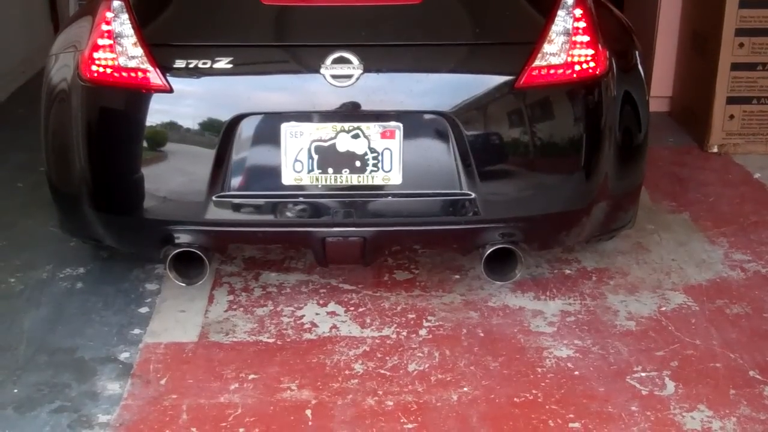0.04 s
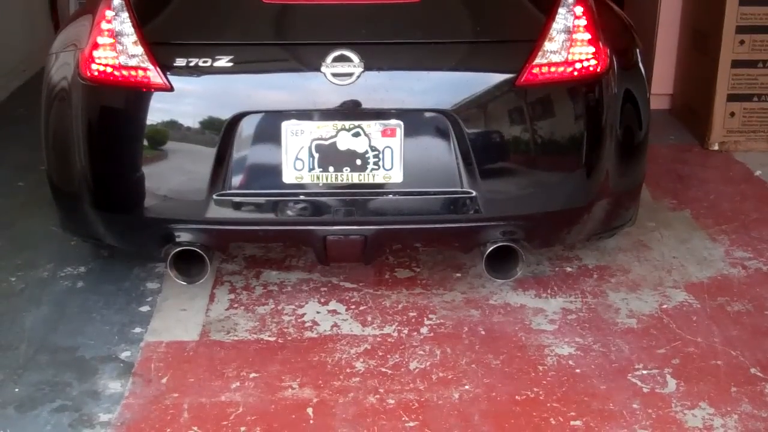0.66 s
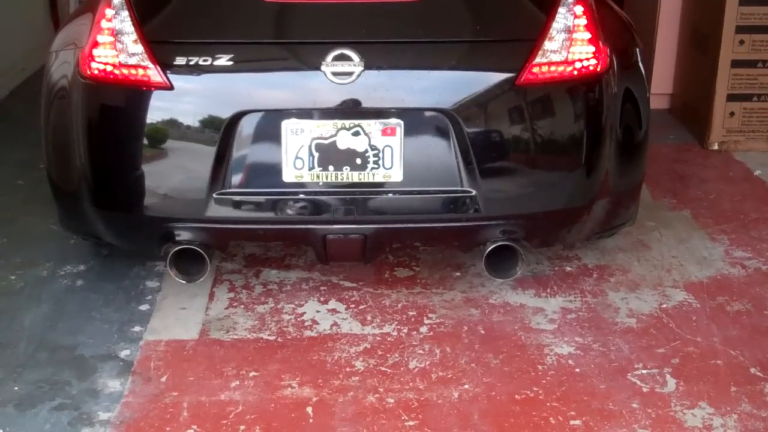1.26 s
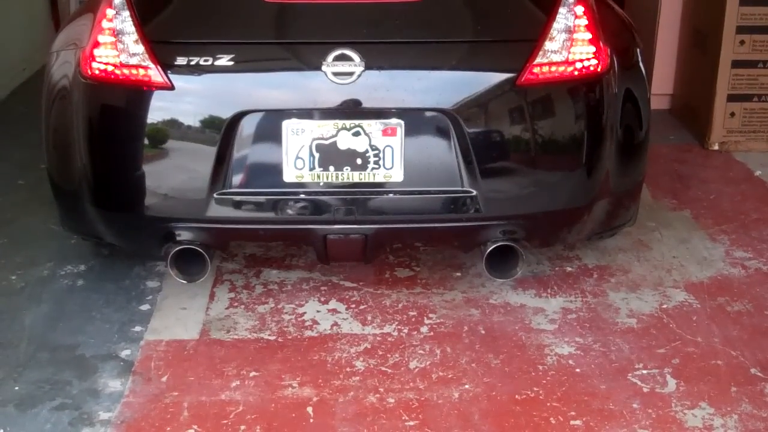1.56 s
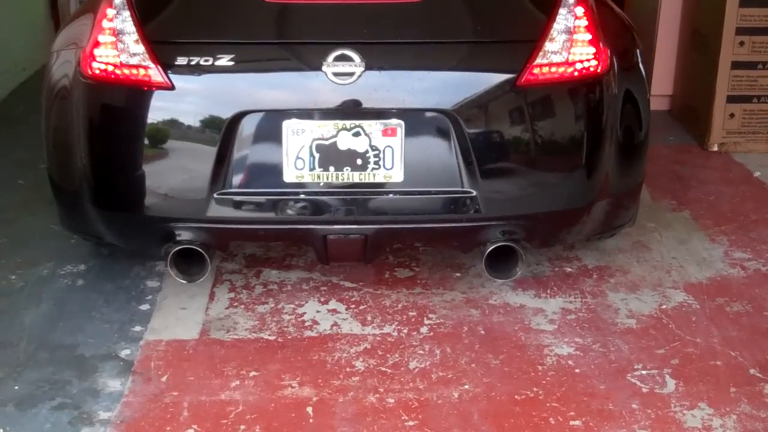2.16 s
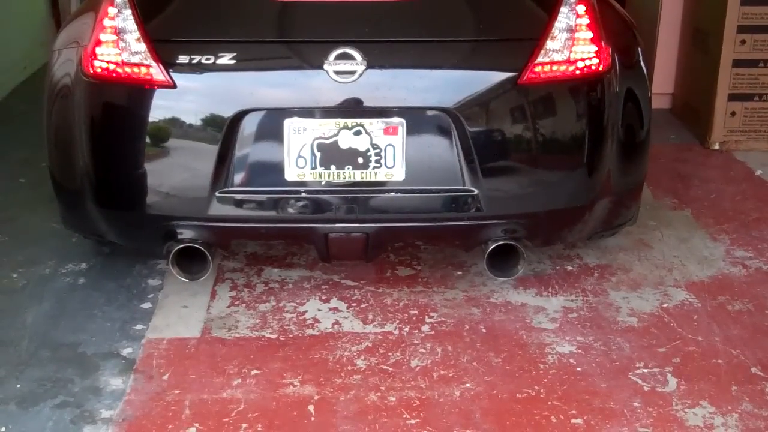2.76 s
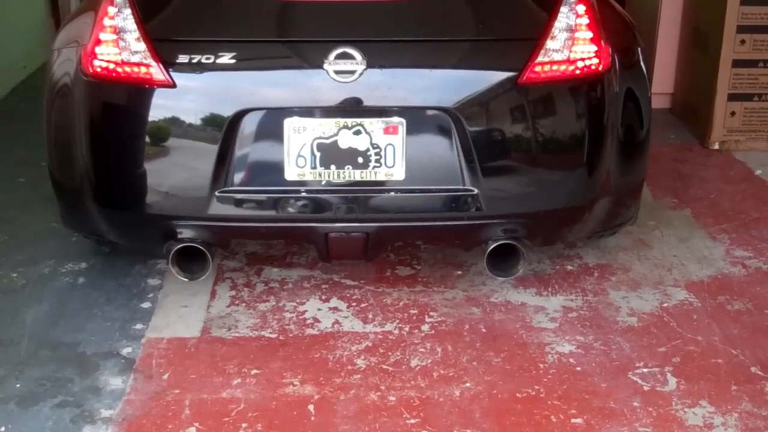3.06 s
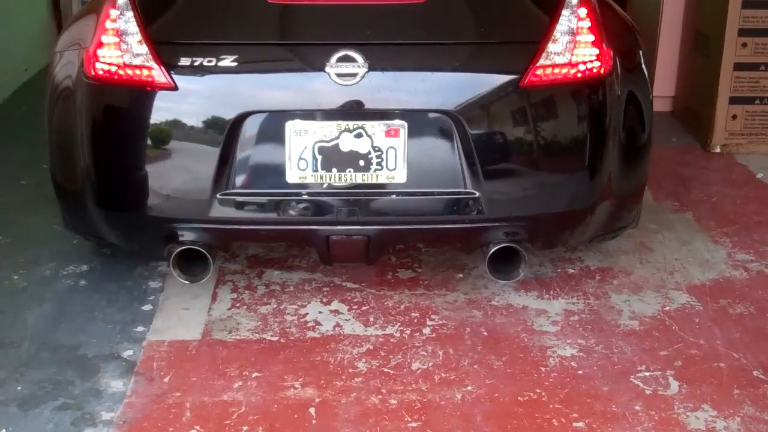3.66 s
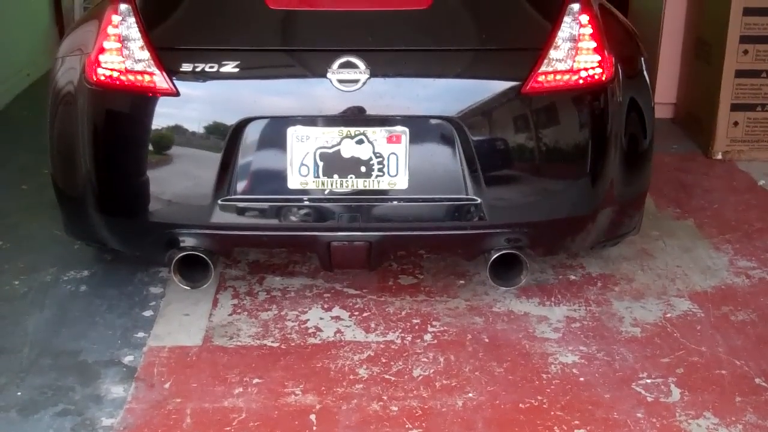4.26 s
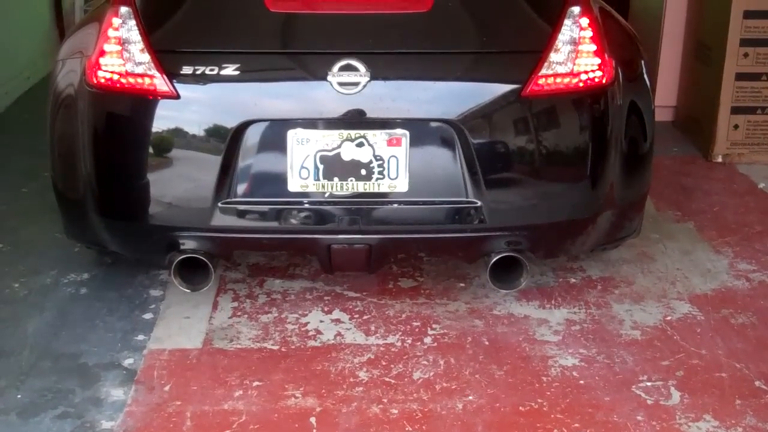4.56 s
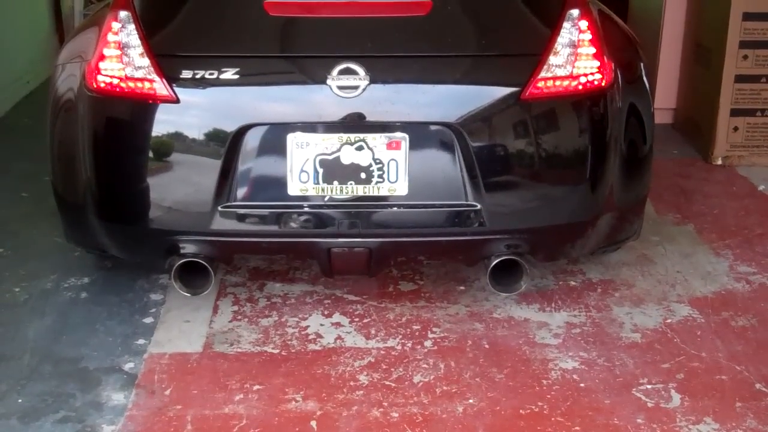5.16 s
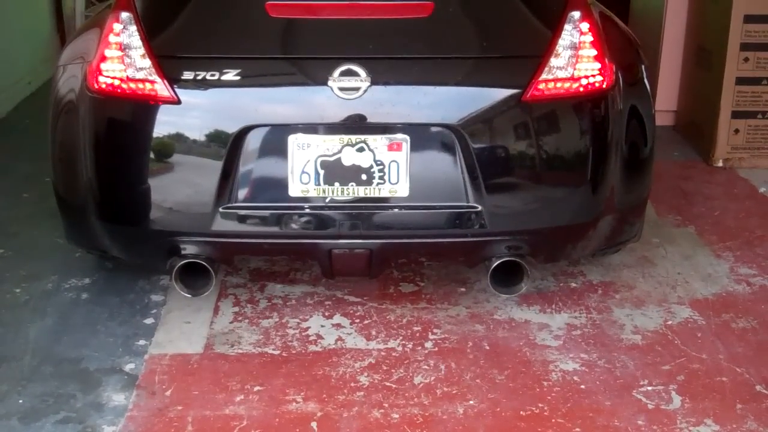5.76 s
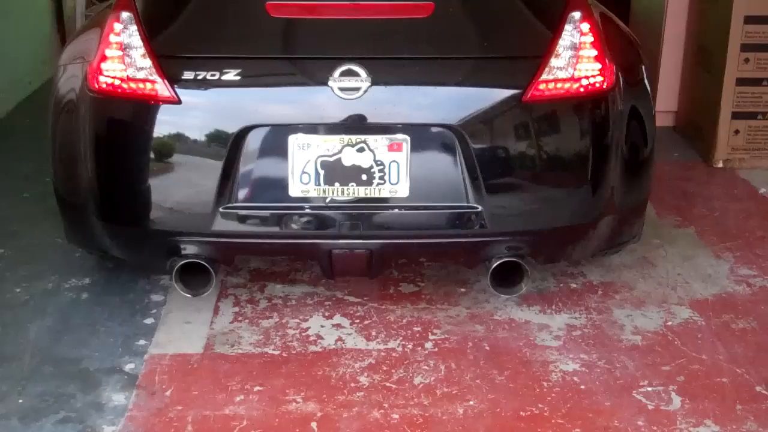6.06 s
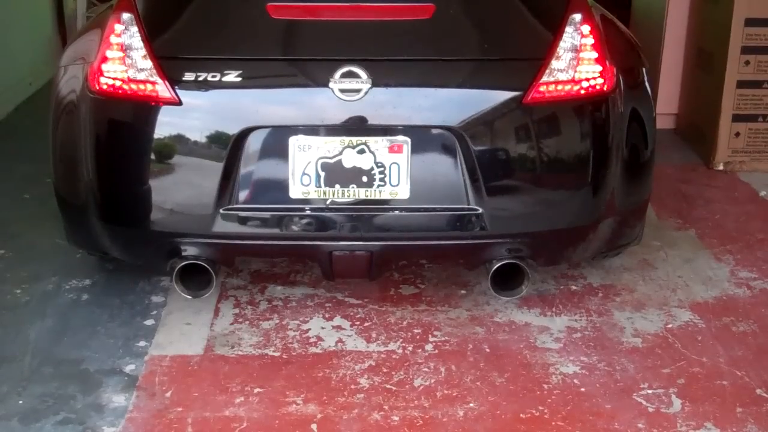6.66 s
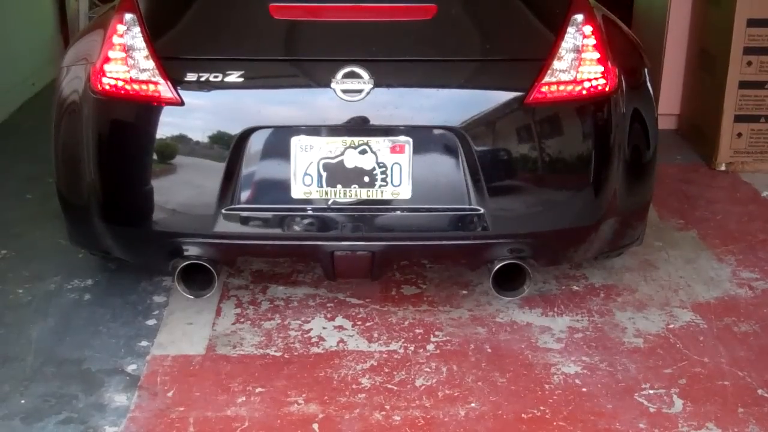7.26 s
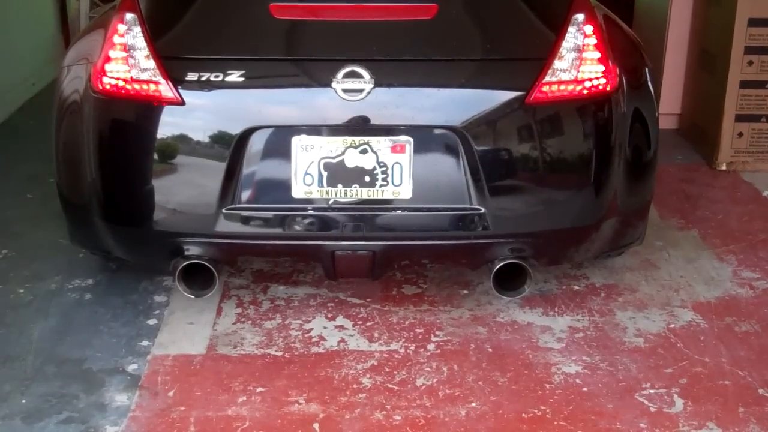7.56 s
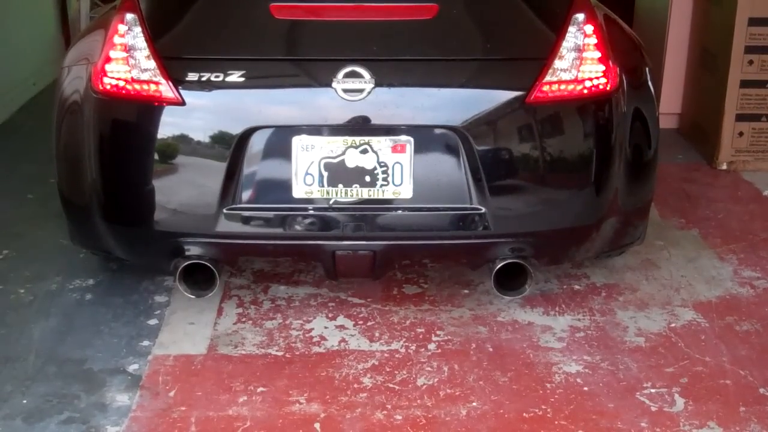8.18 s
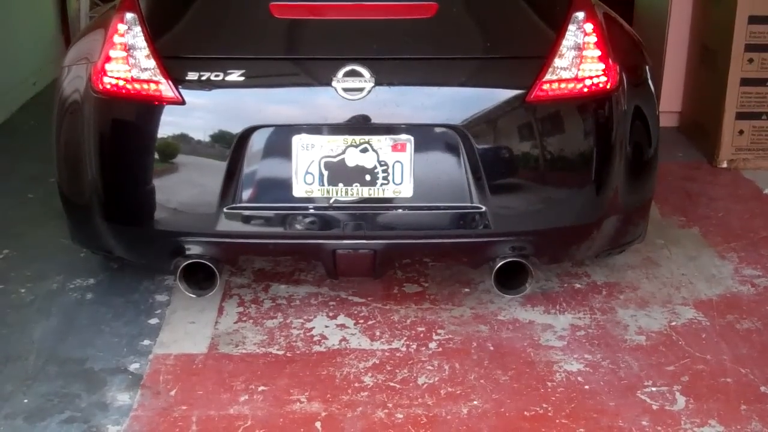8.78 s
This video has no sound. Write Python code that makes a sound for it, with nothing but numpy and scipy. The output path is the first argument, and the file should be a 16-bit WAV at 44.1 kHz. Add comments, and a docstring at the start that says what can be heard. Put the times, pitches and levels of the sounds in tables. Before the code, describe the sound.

A starter motor grinds and clangs at once, straining in three quick strokes with a faint high whine. At about 0.5 seconds a six-cylinder car engine with no muffler catches with a few uneven, thudding bangs. It fires up with a sharp crack near 0.7 seconds and revs to a brief peak just before 1 second. The revs sag around 1.4 seconds, lift again and waver, then settle by about 3 seconds into a loud, fast idle. The exhaust throbs evenly with a low boom, a midrange bark and a hard rasp over a steady hiss. Occasional firings crack harder, most clearly around 5.5 and 6.7 seconds. From about 8.3 seconds the engine speed rises a little, still running at 9 seconds. The sound is close, heard just behind the twin tailpipes, with short garage echoes.

```python
"""A six-cylinder car with no muffler is started in a garage, heard from just behind its two tailpipes.
First the starter motor grinds and clangs, straining each time a piston squeezes the air in a cylinder.
Then the engine catches with a few thudding bangs, revs up and settles into a fast idle over a hiss.
Each firing makes the pipes ring with a low boom, a middle bark and a high rasp. Some cylinders rasp
harder than others, so the idle throbs once per engine cycle. Near the end the speed rises a little."""
import sys
import numpy as np
from scipy import signal
from scipy.fft import rfft, irfft, next_fast_len
from scipy.io import wavfile
from scipy.ndimage import uniform_filter1d

SR = 44100
rng = np.random.default_rng(int(sys.argv[2]) if len(sys.argv) > 2 else 0)


def store_wav(level_fs):
    """Save 16-bit WAV to argv[1]."""
    pcm = np.round(np.clip(np.atleast_2d(level_fs), -1, 1) * 32767)
    wavfile.write(sys.argv[1], SR, pcm.T.astype(np.int16))


N = 397782

# engine speed: it revs up, wavers, idles, then rises a little (time [s], speed [rpm])
ENGINE_SPEED = [(0.66, 1293), (0.72, 1561), (0.84, 1644), (0.94, 1590), (1.22, 1348), (1.42, 1245),
                (1.55, 1374), (1.71, 1472), (2.24, 1361), (2.28, 1292), (2.63, 1352), (2.99, 1293),
                (3.85, 1339), (4.93, 1329), (6.38, 1344), (8.2, 1346), (8.63, 1403), (8.85, 1457)]
# how hard the cylinders fire, compared with the idle (time [s], level [dB])
ENGINE_LOAD = [(0.67, 2), (0.74, -0.5), (0.92, -0.5), (1.08, 2.5), (1.2, -0.9), (1.42, -2.5), (1.5, -8),
               (1.8, 0.5), (2.24, 0), (2.36, -3.5), (2.65, -1), (3.9, 2.5), (4.08, 0.3), (4.3, 1),
               (7.0, 0.5), (8.65, 0.5), (8.9, 1.1)]
# how the cylinders differ, in firing order (strength [dB], valve lag [s], rasp [dB], tick [dB], bark [dB])
CYLINDER_TRAITS = [(-0.17, -.00007, 4, -3, 0), (0, .00017, 3, -4.5, -1.8), (-1.5, -.00003, 6.5, -4, 1.5),
                   (-2, .00002, 7.5, -7.5, 0), (-3.5, -.00025, -0.5, -5, -1.5),
                   (-1.5, .00017, -1, -17, -2.5)]
# single firings that burn hard and crack out (time [s], extra rasp [dB])
CRACKS = [(0.69, 11), (0.702, 4), (1.002, 6), (1.083, 5), (3.212, 2), (3.486, 2), (3.847, 0), (3.937, 4),
          (5.469, 6), (6.617, 6), (6.795, 8.5), (7.702, 3), (7.88, 4)]
# the first, uneven firings, in relative levels (time [s], boom [dB], bark [dB], rasp [dB])
FIRST_BANGS = [(0.522, -32, -52, -59), (0.550, -27.5, -36, -50), (0.574, -27.5, -35.5, -39),
               (0.593, -29, -31, -40.5), (0.61, -27, -34, -41.5), (0.627, -29, -41, -45),
               (0.642, -29.5, -34, -49)]
# the boom is weak while the engine revs above the pipes' own pitch (time [s], level [dB])
BOOM_CURVE = [(0.76, -31.5), (1.0, -29.5), (1.08, -25), (1.44, -26), (1.52, -27.5), (2.1, -23),
              (2.4, -25.1), (3.9, -25.5), (4.05, -26.7), (4.7, -25.5), (8.3, -25), (8.75, -25.5)]
# low, then middle ringing tones of the pipes (pitch [Hz], width [Hz], level [dB], push or pull [+1/-1])
BOOM_TONES = [(135.3, 22.2, -0.1, -1), (157.4, 18.9, -4.5, 1), (211.5, 225, -19, 1), (241.4, 21, -1, -1),
              (276, 18.7, -1.5, 1), (351, 66, -5.5, -1), (374, 10.4, 1.5, 1)]
BARK_TONES = [(472.2, 37.6, -7.5, -1), (480.3, 33.5, -5.5, 1), (545.5, 5.2, -11.5, -1), (569, 24, -18.5, 1),
              (642.2, 16, -19, 1), (679, 26, -17, -1), (733, 23, -18.5, 1), (766.3, 19, -16.5, -1)]
# tones of the tips' rasp, their slap and the pipe walls' tick (pitch [Hz], width [Hz], level [dB])
RASP_TONES = [(870, 91, -9), (915, 19, 4), (993, 103, -0.5), (1098, 95, 2.5), (1216, 50, -2),
              (1361, 22, 1.5), (1440, 24, 0.5)]
SLAP_TONES = [(400, 87, -7), (683, 170, -7.5)]
TICK_TONES = [(2475, 70, -7), (2553, 43, -2), (2720, 79, -7)]
# the starter strains as each piston squeezes its air (time [s], level [dB])
STARTER_STROKES = [(0.088, -34.5), (0.232, -36.5), (0.348, -34.5)]
# the starter's small gear knocks against the engine's big gear (time [s], level [dB])
GEAR_KNOCKS = [(0.078, -31), (0.12, -41), (0.225, -35), (0.344, -42)]
# ringing tones of the big gear and its housing (pitch [Hz], width [Hz], level [dB])
GEAR_TONES = [(915, 33, 4), (960, 28, 2), (1064, 76, -4), (2244, 79, 0), (2407, 18, 6), (2550, 15, -3),
              (2800, 13, 1), (5380, 9.6, 1)]
# tone colour of the grinding gears, the rushing gas and the garage's noise (frequency [Hz], level [dB])
GRIND_COLOUR = [(60, -18), (300, -16), (600, -12.5), (770, -15), (900, -10), (1300, -2), (1780, -1.5),
                (2330, -6), (3140, -1), (5640, -3.5), (6290, -9.5), (10300, -18), (13000, -38)]
HISS_COLOUR = [(1700, 4), (2000, -12), (2450, 3), (3200, 0.5), (4100, 2), (5300, 0), (6500, 2.5),
               (7400, -0.5), (8500, -2), (9400, -1.5), (10300, -4.5), (11000, -9.5), (12500, -19)]
ROOM_COLOUR = [(25, -31), (45, 3.5), (80, -7), (120, -24), (300, -23), (700, -5.5), (2000, -9.5),
               (12000, -48)]
# how alike noise is in both ears (frequency [Hz], likeness [0 to 1])
EAR_LIKENESS = [(100, 0.97), (600, 0.99), (1200, 0.88), (2200, 0.76), (4000, 0.61), (7500, 0.36),
                (12000, 0.19)]
# how far noise leans to the left (frequency [Hz], left minus right [dB])
LEFT_LEAN = [(1000, -0.3), (4000, 0), (5800, 1), (7000, 1), (9000, 8), (11000, 5), (13000, -1.5)]

RUNS_FROM_S, SETTLED_S = .657, 3.3   # the engine runs by itself, then has settled down


def engine(front_lag_s=0.0001, bark_db=-38.5, rasp_db=-46.5, tick_db=-64, slap_db=-47.5):
    """Firings ring the exhaust, more harshly under load; returns the boom, harsh part and gas flow."""
    boom_db, = in_time(BOOM_CURVE)
    load_db, = in_time(ENGINE_LOAD)
    times, sizes, bark_sizes, rasp_sizes, tick_sizes = firings()
    low = from_db(boom_db) * blow_pipe(boom, times, sizes, grit=0.0092)
    barks = blow_pipe(bark, times, bark_sizes, grit=.017 * unevenness(np.arange(N) / SR))
    slaps = even_out(slap(times, bark_sizes * np.sqrt(rasp_sizes)))   # strong pulses steepen in the pipe
    rasps = even_out(rasp(times + front_lag_s, rasp_sizes))
    ticks = even_out(tick(times + front_lag_s, tick_sizes))
    harsh = from_db(bark_db + 1.17 * load_db) * barks   # the bark follows the load most
    harsh += from_db(rasp_db + load_db) * rasps
    harsh += from_db(tick_db + load_db) * ticks
    harsh += from_db(slap_db + load_db) * slaps
    flow = puffs(clicks(times, sizes * np.sqrt(rasp_sizes)), decay_s=0.025)
    return low, harsh, flow


def firings(spread_db=0.41, burn_db=0.35, rasp_spread_db=.9, jitter_s=.00003, wander_s=.00025):
    """Three firings a turn, no two alike; returns their times and boom, bark, rasp and tick sizes."""
    rpm, = in_time(ENGINE_SPEED)
    t = np.arange(N) / SR
    firings_per_s = rpm / 20 * (t >= RUNS_FROM_S)
    count = np.cumsum(firings_per_s) / SR
    number = np.arange(int(count[-1]))
    times = np.interp(number + 1e-6, count, t)
    cylinder = number % len(CYLINDER_TRAITS)
    strength_db, lag_s, rasp_db, tick_db, bark_db = np.array(CYLINDER_TRAITS)[cylinder].T
    crack_s, extra_db = np.transpose(CRACKS)
    nearest_firing = np.abs(times - crack_s[:, None]).argmin(1)
    crack_db = np.bincount(nearest_firing, extra_db, len(times))
    uneven = unevenness(times)
    jitter, spread, burn, wander, burble = rng.standard_normal((len(number), 5)).T * uneven
    drift = rms_one(uniform_filter1d(uniform_filter1d(wander, size=24), size=24))
    times = times + lag_s + jitter_s * jitter + wander_s * drift
    size_db = strength_db + spread_db * spread + burn_db * burn
    bark_sizes = from_db(size_db + bark_db + .5 * (uneven - 0.5) * burble)
    rasp_sizes = from_db(rasp_db / uneven + rasp_spread_db * burn + crack_db)
    return times, from_db(size_db), bark_sizes, rasp_sizes, from_db(tick_db + burn)


def unevenness(t):
    """The fuel burns twice as unevenly at first as it does once the engine has settled."""
    return np.interp(t, [RUNS_FROM_S, SETTLED_S], [2.0, 1])


def blow_pipe(pipe, times, sizes, grit):
    """Exhaust pulses, each trailing some swirling gas, set a pipe ringing."""
    pulses = clicks(times, sizes)
    swirls = puffs(pulses, decay_s=.008) * rng.standard_normal(N)
    return even_out(pipe(pulses + grit * swirls))


def boom(drive):
    """The low tones of the long pipes; the small tips let out little below them."""
    return cut(cut(pipe_ring(drive, BOOM_TONES), 97.5, "high"), 213, "low")


def bark(drive):
    """The middle tones of the pipes."""
    return cut(cut(pipe_ring(drive, BARK_TONES), 326, "high", order=4), 873, "low", order=14)


def rasp(times, sizes, return_s=.0082, return_db=-8, grit=.06):
    """Each pulse's steep front rings the tips with a rough puff, and again after a trip along the pipe."""
    fronts = clicks(times, sizes) + from_db(return_db) * clicks(times + return_s, sizes)
    swirls = puffs(fronts, decay_s=0.0035) * rng.standard_normal(N)
    ring = resonate(fronts + grit * swirls, RASP_TONES)
    return cut(cut(ring, 756, "high", order=6), 1530, "low", order=9)


def slap(times, sizes):
    """A short, dry knock as the front of each pulse leaves the tips."""
    knocks = resonate(-clicks(times, sizes), SLAP_TONES)
    return cut(cut(knocks, 326, "high"), 864, "low", order=6)


def tick(times, sizes, grit=0.4):
    """Each pulse knocks on the pipe walls with a faint metallic tick."""
    knocks = clicks(times, sizes)
    scatter = puffs(knocks, decay_s=0.002) * rng.standard_normal(N)
    return resonate(knocks + grit * scatter, TICK_TONES)


def first_bangs(boom_gain_db=62, bark_gain_db=59, rasp_gain_db=46, slap_gain_db=50, thud_gain_db=49):
    """Lone bangs shove the still air out of the pipes with a thud; returns the low and harsh parts."""
    times, boom_db, bark_db, rasp_db = np.transpose(FIRST_BANGS)
    pulses = clicks(times, from_db(boom_db))
    thud = from_db(thud_gain_db) * cut(resonate(pulses, [(42.4, 39, 0)]), 140, "low")
    booms = from_db(boom_gain_db) * cut(boom(pulses), 365, "low", order=4)
    bark_pulses = clicks(times, from_db(bark_db))
    swirls = 0.13 * puffs(bark_pulses, decay_s=0.0091) * rng.standard_normal(N)
    barks = from_db(bark_gain_db) * bark(bark_pulses + swirls)
    rasps = from_db(rasp_gain_db) * rasp(times + .001, from_db(rasp_db))
    slaps = from_db(slap_gain_db) * slap(times, from_db(bark_db))
    return thud + booms, barks + rasps + slaps


def starter(tooth_hz=715, ring_db=-5, grind_db=-0.5, chatter_db=0.5, whine_hz=5550, whine_db=-45):
    """Gear teeth grind unevenly, ring their housing and clang; once up to speed, the starter whines."""
    t = np.arange(N) / SR
    teeth = 1 + 0.29 * np.sin(2 * np.pi * tooth_hz * t)
    chatter = from_db(chatter_db * rms_one(uniform_filter1d(rng.standard_normal(N), size=250)))
    grind = rms_one(teeth * chatter) * stereo_noise(GRIND_COLOUR)
    ring = rms_one(resonate(grind, GEAR_TONES))
    knock_s, knock_db = np.transpose(GEAR_KNOCKS)
    knocks = puffs(clicks(knock_s, from_db(knock_db)), decay_s=.02)
    clang = knocks * rms_one(resonate(grind, GEAR_TONES[:3]))
    up_to_speed = uniform_filter1d(1. * ((t > 0.17) & (t < .56)), size=900)
    whine = from_db(whine_db) * up_to_speed * rms_one(resonate(grind, [(whine_hz, 130, 0)]))
    gears = from_db(grind_db) * grind + from_db(ring_db) * ring
    return from_db(starter_effort_db(t)) * gears + clang + whine


def starter_effort_db(t, base_db=-36.5, stroke_width_s=0.026, pull_db=-31, pull_from_s=0.407):
    """The starter swells on each stroke, pulls hard until the engine catches, then fades away."""
    swells = sum(from_db(db) ** 2 * np.exp(-.5 * ((t - s) / stroke_width_s) ** 2)
                 for s, db in STARTER_STROKES)
    strokes_db = 10 * np.log10(from_db(base_db) ** 2 + swells)
    pulling = np.clip((t - pull_from_s) / 0.022, 0, 1)
    run_down_db = 88 * np.maximum(t - 0.53, 0)   # it slows, losing 88 dB a second
    let_go_db = 68 * np.maximum(t - 0.63, 0)   # and fades faster once the gears part
    return strokes_db + pulling * (pull_db - strokes_db) - run_down_db - let_go_db


def gas_hiss(flow, hiss_db=-51.5, build_from_s=0.9, build_db=4.5, build_s=0.12):
    """Rushing gas hisses: it grows after the engine catches, follows the load and swells at each puff."""
    load_db, = in_time(ENGINE_LOAD)
    age_s = np.maximum(np.arange(N) / SR - build_from_s, 0)
    level_db = hiss_db + 0.12 * load_db - build_db * np.exp(-age_s / build_s)
    hiss = cut(stereo_noise(HISS_COLOUR), 1630, "high")
    return from_db(level_db) * hiss * rms_one(1 + rms_one(flow))


def garage_echoes(x, die_away_s=0.21):
    """Sound bounces from wall to wall: eight echoes a side, each losing 60 dB in die_away_s."""
    out = np.zeros((2, N))
    lags = (np.geomspace(.011, .043, 16) * SR).astype(int)
    for k, lag in enumerate(lags):
        loop, gain = x.copy(), from_db(-60 * lag / SR / die_away_s)
        for i in range(lag, N, lag):
            loop[i:i + lag] += gain * loop[i - lag:i][:N - i]
        out[k % 2] += (loop - x) * (-1) ** (k // 2)   # every other echo on a side is flipped
    return out / np.sqrt(8)


def stereo_noise(colour):
    """Noise of a given tone colour, alike in both ears in the bass and spread out in the treble."""
    size = next_fast_len(N, True)
    hz = np.maximum(np.arange(size // 2 + 1) * SR / size, 1)
    middle, side = rfft(rng.standard_normal((2, size)))
    alike = np.clip(at_hz(EAR_LIKENESS, hz), -.9, 1)
    ears = np.array([[1], [-1]])
    both = middle + ears * side * np.sqrt((1 - alike) / (1 + alike))
    both *= from_db(ears * at_hz(LEFT_LEAN, hz) / 2)
    out = irfft(both * from_db(at_hz(colour, hz)), size)[:, :N]
    return out / np.std(out.mean(0))


def pipe_ring(x, tones):
    """Ring a pipe's tones, each pushing or pulling at the outlet."""
    return sum(np.sign(direction) * resonate(x, [tone]) for *tone, direction in tones)


def resonate(x, tones):
    """Ring several tones at once; the narrower a tone, the longer it rings."""
    out = 0
    for hz, width_hz, db in tones:
        r = np.exp(-np.pi * width_hz / SR)
        feedback = [1, -2 * r * np.cos(2 * np.pi * hz / SR), r * r]
        out = out + from_db(db) * (1 - r * r) / 2 * signal.lfilter([1, 0, -1], feedback, x + 1e-18)
    return out


def clicks(times, sizes):
    """One click at each time."""
    return np.bincount(np.clip(np.round(times * SR), 0, N).astype(int), sizes, N + 1)[:N]


def puffs(x, decay_s):
    """Turn each click into a fading puff of the same height."""
    return signal.lfilter([1], [1, -np.exp(-1 / (decay_s * SR))], x + 1e-18)


def even_out(x, window=7900):
    """Hold the power near one over about two idle cycles; the throb within a cycle stays."""
    running = (np.arange(N) > RUNS_FROM_S * SR) + 1e-9
    power = uniform_filter1d(x ** 2, size=window) / uniform_filter1d(running, size=window)
    return x / np.sqrt(np.abs(power) + 1e-4 * np.mean(x ** 2))


def cut(x, hz, kind, order=2):
    """Keep the "low" or "high" side of hz; a higher order cuts more sharply."""
    return signal.sosfilt(signal.butter(order, hz, kind, fs=SR, output="sos"), x + 1e-18)


def in_time(rows):
    """Read a table over time at every sample."""
    times, *columns = np.transpose(rows)
    return [np.interp(np.arange(N) / SR, times, column) for column in columns]


def at_hz(rows, hz):
    """Read a table at any frequency, with octaves evenly spaced."""
    frequencies, values = np.transpose(rows)
    return np.interp(np.log(hz), np.log(frequencies), values)


def from_db(db):
    """Turn decibels into a multiplier."""
    return 10 ** (np.asarray(db) / 20)


def rms_one(x):
    """Scale to an average power of one."""
    return x / np.sqrt(np.mean(x ** 2) + 1e-20)


def scene(harsh_echo_db=-13, low_echo_db=-28, room_noise_db=-56, right_lean_db=.35):
    """The pipes, a touch to the right, with their echoes, the starter, the hiss and the room's noise."""
    low, harsh, flow = engine()
    first_low, first_harsh = first_bangs()
    low, harsh = low + first_low, harsh + first_harsh
    echoes = garage_echoes(from_db(harsh_echo_db) * harsh + from_db(low_echo_db) * low)
    pipes = (low + harsh) * from_db(np.array([[-1], [1]]) * right_lean_db / 2)
    car = pipes + starter() + gas_hiss(flow)
    return car + echoes + from_db(room_noise_db) * stereo_noise(ROOM_COLOUR)


def record(dry, cutoff_hz=14400):
    """The highest treble is cut off steeply."""
    return signal.sosfilt(signal.cheby2(14, 60, cutoff_hz, fs=SR, output="sos"), dry)


dry = scene()
out = record(dry)
store_wav(out)
```